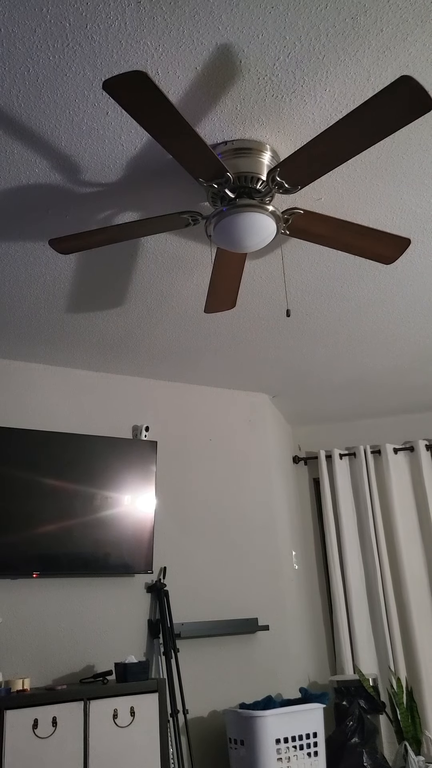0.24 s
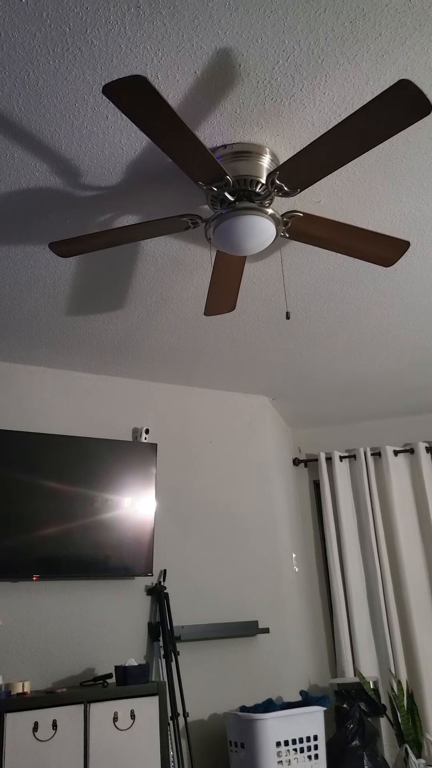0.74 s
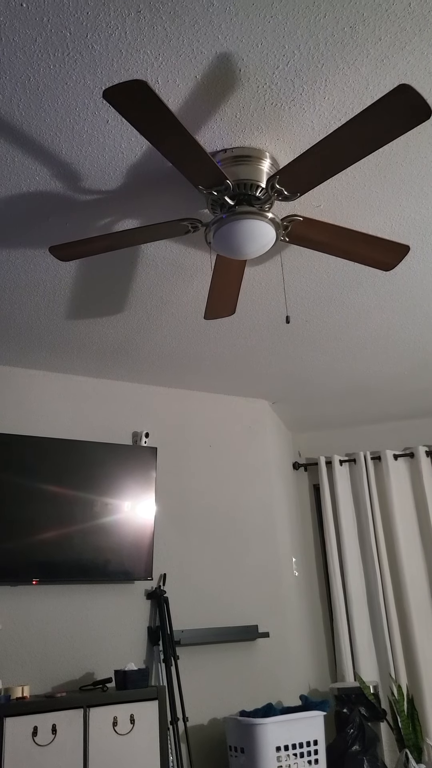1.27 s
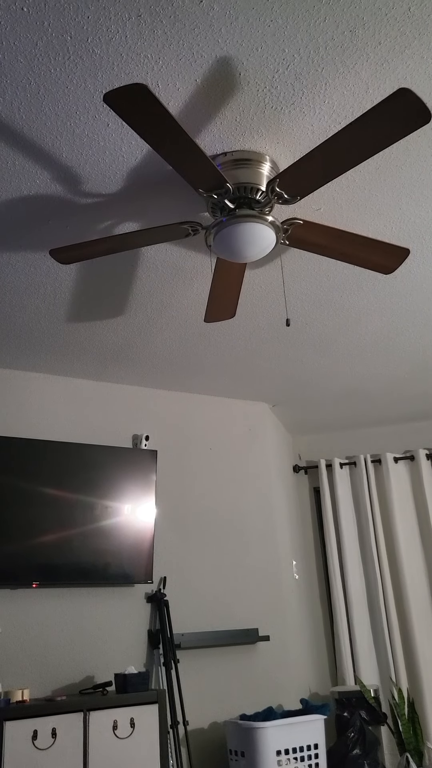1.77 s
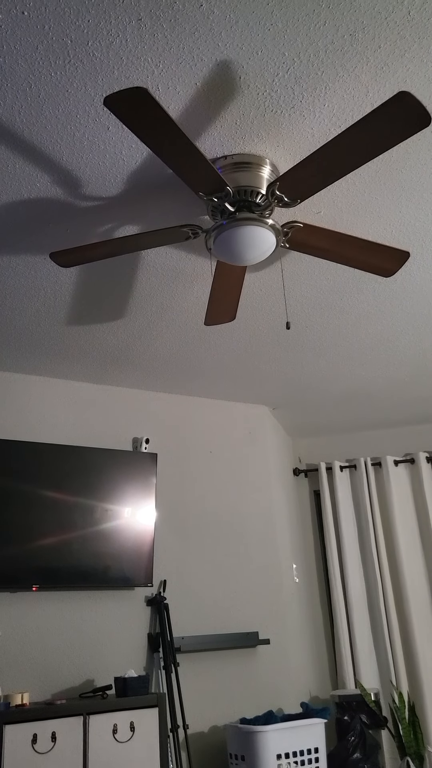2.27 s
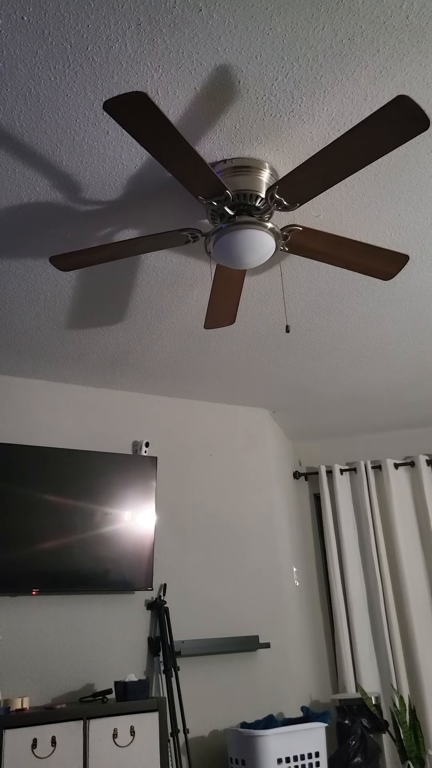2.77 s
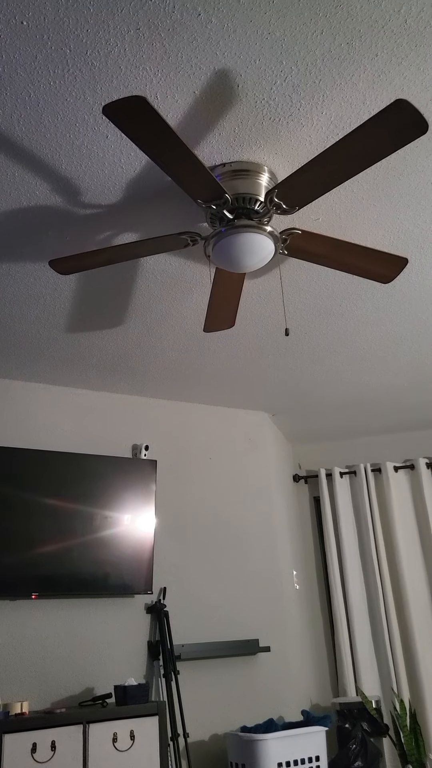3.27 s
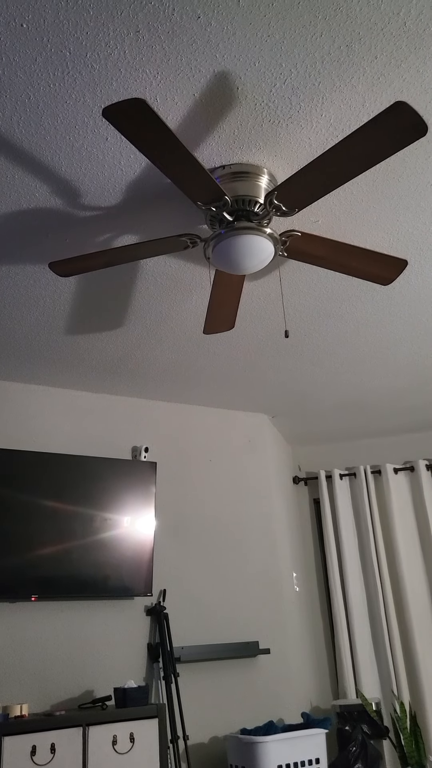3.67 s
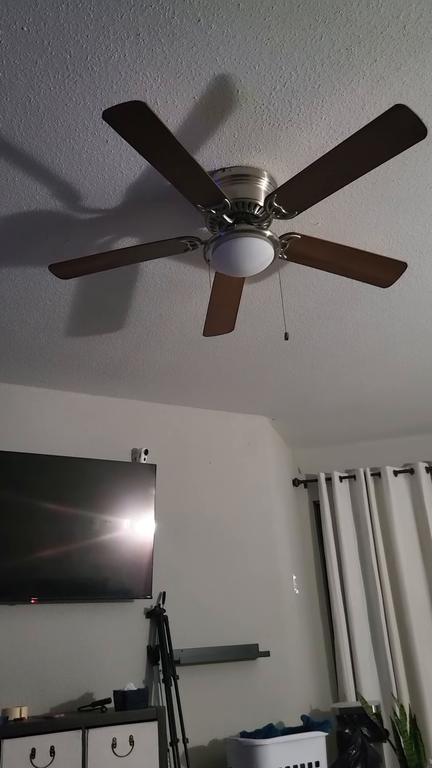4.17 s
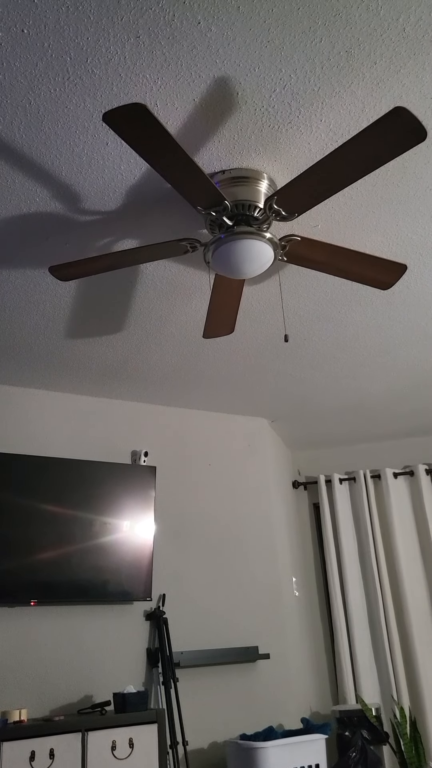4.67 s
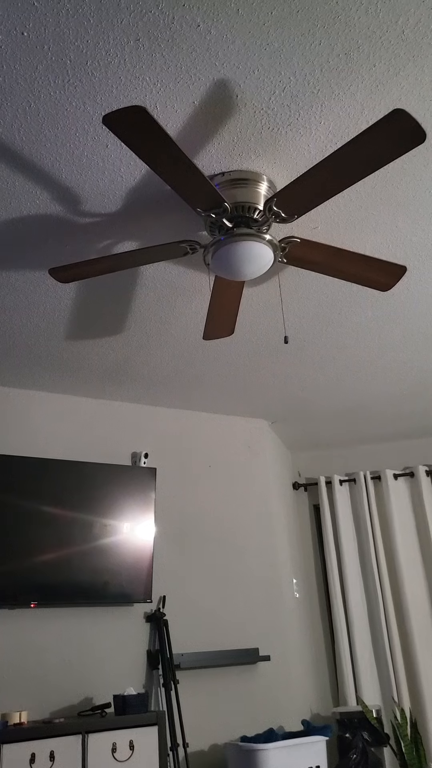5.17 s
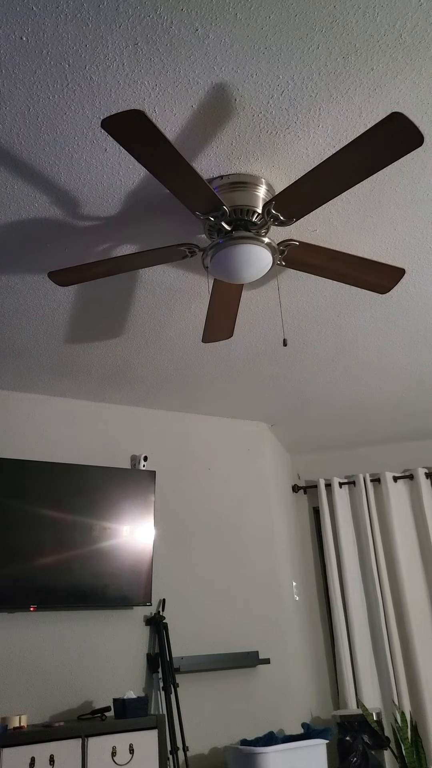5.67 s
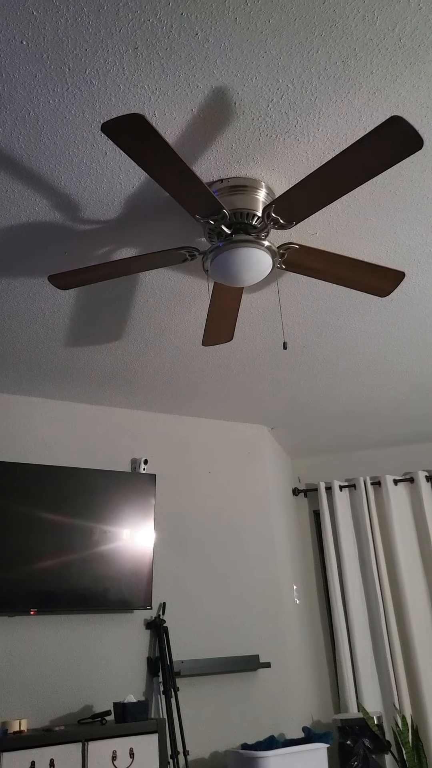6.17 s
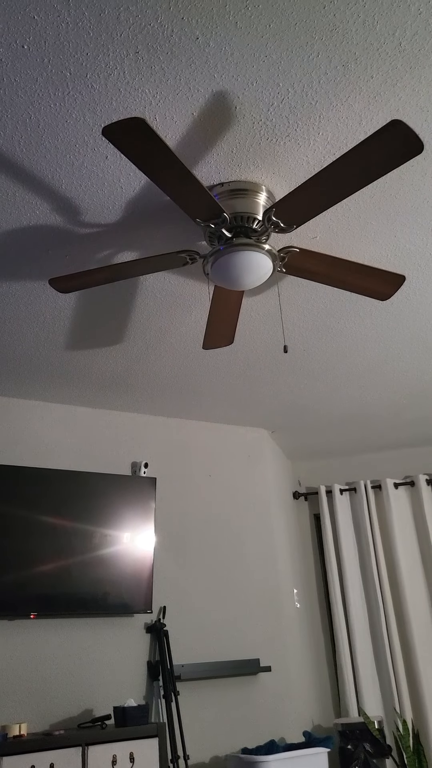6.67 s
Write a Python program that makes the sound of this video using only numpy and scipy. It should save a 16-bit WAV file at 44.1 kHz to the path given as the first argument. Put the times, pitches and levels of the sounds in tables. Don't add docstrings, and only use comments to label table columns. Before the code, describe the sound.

Heavy footsteps run across the floor above a quiet room at night, deep muffled thuds about twice a second, with ceiling cracks and faint buzzes.

```python
import sys
import numpy as np
from scipy import signal
from scipy.fft import rfft, irfft, next_fast_len
from scipy.io import wavfile
from scipy.ndimage import uniform_filter1d, map_coordinates

SR = 44100
rng = np.random.default_rng(int(sys.argv[2]) if len(sys.argv) > 2 else 0)


def natural_amplitude(level_db):
    exponent = np.asarray(level_db, float) / 20
    return 10 ** exponent


def digitize_waveform(pressure):
    field = np.atleast_2d(pressure).T
    bounded = np.clip(field, -1, 1)
    quanta = np.round(bounded * 32767).astype(np.int16)
    wavfile.write(sys.argv[1], SR, quanta)


N = 305039

# (crest time [s], peak level [dB], pitch [Hz], rise [ms], fall [ms])
STEPS = [(0.936, -27, 57.6, 34, 21), (1.444, -20, 58.8, 23.7, 19.5), (1.934, -27.5, 45.2, 53, 30),
         (2.379, -27, 50.7, 27.6, 25), (2.839, -17.5, 61.4, 18.1, 31), (3.318, -23.5, 70, 11, 24),
         (3.364, -25, 65.2, 30, 78), (3.785, -29, 56.6, 26, 30), (4.264, -26.5, 45.2, 21, 51),
         (4.763, -21.5, 45.5, 34, 27), (5.258, -23, 40.7, 36.6, 9.7), (5.738, -25.5, 49, 31, 28)]
# (crest time [s], peak level [dB], pitch [Hz], rise [ms], fall [ms])
STIFF_SWINGS = [(3.445, -41.5, 92.3, 20, 24), (3.641, -45, 86, 18, 30), (4.263, -36, 83.6, 16, 56),
                (4.548, -42.5, 94, 15, 28), (4.75, -35.5, 88.2, 29, 23), (5.236, -31.5, 81, 18, 24),
                (5.25, -48.5, 157, 22, 35), (1.906, -47, 118.6, 18, 33), (4.36, -46, 202, 25, 30),
                (4.585, -48.5, 150, 19, 25), (4.86, -46, 186, 15, 16), (1.49, -46.5, 150, 18, 22),
                (2.0, -50, 194, 17, 29), (5.33, -51.5, 320, 19, 25), (2.85, -49, 276, 18, 20),
                (1.75, -53.5, 285, 14, 20), (.4, -44.5, 140, 25, 20), (1.965, -57.5, 630, 18, 17),
                (3.27, -45, 215, 18, 25), (2.4, -49.5, 190, 14, 20), (4.32, -55.5, 519, 8.2, 14)]
# (crest time [s], peak level [dB], pitch [Hz])
REBOUNDS = [(1.005, -31.5, 61.5), (1.063, -32.5, 53.2), (1.152, -42, 59), (1.26, -49, 60),
            (1.53, -29, 59.6), (1.574, -30, 42.9), (1.692, -38, 39.3), (2.071, -34, 45.5), (2.433, -32, 64),
            (2.47, -31, 55.8), (2.53, -35.5, 56), (2.95, -32, 40.2), (2.989, -29.5, 41.1),
            (3.49, -32, 52.6), (3.52, -34.5, 54), (3.848, -36.5, 46.6), (3.895, -39, 44),
            (4.329, -30, 38.4), (4.401, -34.5, 47.4), (4.476, -42.5, 47.8), (4.816, -24.5, 51),
            (4.907, -39, 49.3), (4.951, -32.5, 46.2), (5.296, -28, 49.8), (5.393, -41, 55.6),
            (5.436, -38, 51.4), (5.788, -28, 54), (5.84, -36, 52.8), (5.913, -36, 50.6)]
# (crest time [s], peak level [dB], pitch [Hz])
SHUFFLES = [
    (0.164, -33.5, 51.4),
    (0.228, -35, 53.3),
    (0.308, -35.5, 52),
    (0.435, -32.5, 51),
    (0.526, -36, 51.7),
    (0.604, -35.5, 60),
    (0.694, -34, 42),
    (0.858, -35, 55.4),
    (6.217, -42, 50.5),
    (6.799, -40.5, 44),
]
REBOUND_RISE_MS, REBOUND_FALL_MS, SHUFFLE_RISE_MS, SHUFFLE_FALL_MS = 22.2, 23, 12, 18

# (time [s], peak level [dB], hardness [dB], slap [dB])
KNOCKS = [(0.128, -43.5, -17.5, -31), (0.37, -38.5, -8, -24), (0.391, -41, -7.5, -25.5),
          (0.576, -39.5, -18, -35), (0.801, -45.5, -19, -30), (0.919, -38, -13.5, -31),
          (1.425, -40.5, -17.5, -32.5), (1.479, -50, -11, -25.5), (1.73, -54, -2.5, -19),
          (1.871, -35, -15.5, -33.5), (1.977, -45, -10, -21.5), (2.352, -33, -13, -30.5),
          (2.438, -47, 1, -16), (2.554, -48.5, -11.5, -24), (2.822, -38.5, -11, -26),
          (3.245, -35, -12, -36), (3.32, -35.5, -12.5, -25), (3.376, -43, -10, -25),
          (3.763, -38.5, -6.5, -21), (3.809, -44, -4, -22), (4.294, -42, -19, -35),
          (4.328, -39, -13.5, -30.5), (4.533, -41.5, -14.5, -41), (4.585, -50.5, -8.5, -30.5),
          (4.739, -41, -12.5, -29.5), (4.8, -43, -21.5, -34.5), (5.223, -50.5, -19.5, -34),
          (5.297, -39.5, -3.5, -16.5), (5.709, -48.5, -8, -29), (6.318, -49, -7.5, -22.5),
          (6.72, -54, -8, -20), (6.83, -58, -10, -21), (4.855, -50, -18.5, -31), (0.68, -48.5, -14, -25.5)]
# (frequency [Hz], width [Hz], level [dB])
BOARD_MODES = [(91.7, 25.6, -2), (135, 26, 1), (165.2, 11.1, 1.5), (207.4, 12.7, 1), (275, 25, -1.5),
               (320, 60, -6.5), (431, 110, -10.5), (549, 140, -13)]

# (time [s], peak level [dB], low band [dB], high band [dB], air band [dB])
CRACKS = [(0.915, -57.5, -14, -5.5, -19.5), (1.866, -59.5, -5, 2, -6), (1.9375, -55, -9, -6, -16),
          (1.944, -50.5, -3, -19, -30), (2.287, -67, -6, -7, -30), (2.347, -52, -14, -6.5, -9),
          (2.4209, -51.5, -1, -12, -21), (2.5278, -61, 0.5, -4, -23), (2.8115, -50.5, -28, -11, -24.5),
          (2.842, -54.5, -21, -14.5, -36), (3.257, -83, 2, -9.5, -15), (3.3125, -39.5, -8, -13.5, -25.5),
          (3.769, -37.5, -6, -16, -19.5), (4.3128, -62.5, -4, -9, -28), (4.317, -64.5, 10.5, -17, -33),
          (5.296, -41.5, -0.5, -8.5, -10.5)]
# (time [s], peak level [dB], low band [dB], high band [dB], air band [dB])
TICKS = [
    (.32, -67, 5, -20, -40),
    (2.217, -76, 3, -14, -30),
    (3.304, -65, -4, -6, -25),
    (3.754, -67, -12, -3, -25),
    (3.762, -58, -14, -12, -30),
    (4.259, -80, 10, -14, -30),
    (5.288, -55, -12, -14, -28),
    (6.834, -82, 12, -14, -30),
]
AIR_T60_S = 0.018

# (time [s], peak level [dB], pitch [Hz], high shelf [dB], low shelf [dB])
RATTLES = [(0.9312, -70, 2790, -11, -4), (1.0102, -71, 2340, -12, -5.5), (1.4145, -71, 3360, -12, 1),
           (1.4968, -67, 2240, -12, -2.5), (1.8745, -59.5, 2420, -9, -5), (1.874, -70.5, 4350, -5, -10),
           (1.886, -67, 2430, -11, -7), (1.945, -62, 2040, -23, -7), (1.955, -66.5, 4400, -15, -7),
           (1.99, -79.5, 2470, -21, 0), (2.293, -70.5, 2980, -6, -5.5), (2.356, -56, 2300, -9.5, -12),
           (2.422, -68, 3310, -30.5, 3.5), (2.812, -66.5, 3770, -14, -9.5), (2.83, -67, 4300, -11, -13.5),
           (2.861, -66.5, 3270, -15, -6), (2.889, -70, 3040, -25.5, 3.5), (2.929, -71, 2180, -30, -12.5),
           (3.246, -69, 2200, -7, 0), (3.3241, -52, 2530, -23, -7.5), (3.785, -52, 2680, -28, -6),
           (3.84, -66, 2320, -23, -12), (3.9, -69.5, 2840, -22, -8), (4.259, -75, 2180, -13.5, 6.5),
           (4.339, -69.5, 2180, -35, 2), (4.7323, -69, 2280, -18.5, -0.5), (5.232, -69, 2970, -4.5, -1),
           (5.312, -53, 2160, -24, -4.5), (5.368, -70.5, 2920, -30.5, -4), (5.708, -71, 2390, -30, -3.5),
           (6.305, -73, 1940, -20, 1), (6.759, -86, 2700, -10, 12)]
# (frequency [Hz], width [Hz], level [dB])
PANEL_MODES = [(1305, 220, -6), (1990, 320, -6), (2410, 320, -8), (2950, 600, -6), (4350, 450, -8)]
# (frequency [Hz], level [dB])
PANEL_COLOUR = [(300, -23.5), (500, -6.5), (1000, 5), (1600, -5.5), (2000, -4.5), (3000, -6), (4400, -9.5),
                (4900, -10.5), (8000, -19), (9500, -42)]
SWELL_MS, PANEL_SCATTER = 10.8, 0.029

# (peak time [s], level [dB], rise [s], low band [dB], high band [dB])
RUBS = [
    (0.01, -61, 0.068, -2, -6.5),
    (0.082, -61.5, 0.045, 3, -21),
    (0.335, -67.5, 0.029, 5, -25),
    (0.39, -67, 0.058, 0, -21),
    (0.435, -76, 0.037, 7.5, -22),
    (0.469, -58, 0.049, -4, -11),
    (0.53, -69.5, .04, -4.5, -3),
    (0.57, -76.5, 0.037, 1, -4),
    (0.666, -70.5, 0.05, -5, -21),
    (0.71, -72, 0.04, -9.5, -18),
]
# (frequency [Hz], width [Hz], level [dB])
FIXTURE_MODES = [(616, 74, 5.5), (860, 120, 6), (1540, 120, -3), (2280, 130, 7), (3070, 130, -2),
                 (3350, 100, 4), (3790, 100, 3), (4400, 200, -3.5)]
# (time [s], peak level [dB], pitch [Hz], length [s])
SQUEAKS = [(0.0054, -52, 3800, 0.022), (.012, -78.5, 7560, .018), (.045, -84, 7500, 0.016),
           (0.034, -59, 2290, 0.043), (0.06, -53, 2260, 0.031), (.088, -54, 2270, .016),
           (0.067, -66, 1883, 0.03), (0.088, -53, 354, 0.019), (0.044, -63.5, 3790, .06),
           (.14, -74, 3810, .07), (0.22, -79.5, 3800, .04), (0.24, -73, 2270, .03),
           (0.075, -56.5, 604, 0.044), (0.07, -64, 900, 0.063), (0.315, -58.5, 800, 0.06),
           (0.32, -72.5, 3380, 0.054), (.36, -66, 3100, 0.055), (0.33, -64.5, 2300, 0.05),
           (.38, -66, 2300, .055), (0.352, -61, 545, 0.055), (0.33, -67, 1530, 0.068),
           (0.345, -52.5, 510, 0.012), (0.36, -49.5, 340, 0.044), (0.36, -56.5, 740, 0.04),
           (0.36, -59, 606, 0.038), (0.49, -61.5, 890, 0.049), (0.467, -72.5, 4000, 0.019),
           (0.465, -68, 5400, 0.02), (0.45, -67, 2900, 0.047), (0.45, -65.5, 3720, 0.056),
           (0.41, -65, 2000, 0.019), (0.479, -61.5, 2295, 0.031), (0.45, -66.5, 2330, 0.035),
           (0.645, -72, 3200, 0.045), (0.63, -73, 3660, 0.058), (.725, -76, 3500, .04),
           (.71, -75, 3080, .03), (.645, -73, 2000, .025), (1.0, -71, 2350, 0.037), (1.88, -57, 2450, 0.02),
           (1.957, -57, 2010, 0.025), (1.875, -66.5, 4350, 0.038), (1.965, -68, 4300, .03),
           (1.885, -67, 2800, .04), (2.292, -74, 3030, 0.044), (2.365, -59, 2250, .03),
           (1.99, -65.5, 2520, 0.023), (2.836, -59, 3570, 0.018), (2.878, -63.5, 3130, 0.022),
           (2.955, -71.5, 2100, 0.034), (4.335, -65, 2030, .02), (5.4, -69.5, 2200, 0.016),
           (6.2, -60, 150, 0.13)]
RUB_FADE_DB_PER_S = 129
WAVER_RAD, FLUTTER_DB = .09, 4

# (time [s], rustle level [dB])
STIR = [
    (0.0, -71.5),
    (0.17, -82.5),
    (0.38, -75.5),
    (0.5, -74),
    (1.13, -83),
    (3.5, -86),
    (5.4, -89.5),
    (6.92, -89.5),
]
# (frequency [Hz], density [dB per Hz])
RUMBLE = [(15, -52), (25, 24.5), (42, 23.5), (62, 21), (90, 13), (130, -49)]
UNREST_TOP_DB = -66.5
CALM_DB, UNREST_SHARE, AFTER_DB, AFTER_SHARE, AFTER_S = -58.5, 0.88, -50.5, 0.43, .11

# (time [s], level [dB])
AIR = [
    (0, -100),
    (.2, -103),
    (.55, -102),
    (.9, -109),
    (6.92, -118),
]
# (frequency [Hz], level [dB rms])
HUM = [(160, -67.5), (201, -65), (320, -68), (7480, -112)]
# (frequency [Hz], density [dB per Hz])
QUIET = [(20, -12), (44, -7.5), (70, -6.5), (116, -17), (230, -19), (480, -31), (1000, -40.5), (1400, -44),
         (1900, -54), (3500, -70), (4500, -66.5), (5000, -64), (8000, -72), (15400, -65)]
QUIET_DB = -58

# (frequency [Hz], t60 [s])
ROOM = [(150, 0.42), (800, 0.47), (2500, 0.49), (5000, 0.53), (8000, 0.4), (13000, 0.13)]
# (frequency [Hz], correlation [-1..1])
ALIKE = [(60, 0.99), (130, 1), (290, 1), (640, 0.62), (1410, 0.016), (3100, 0.012), (6820, -0.7),
         (15000, 0.6)]
# (frequency [Hz], left minus right [dB])
TILT = [(60, 0.5), (110, 1), (200, -1), (380, -1), (700, 0.5), (1290, 2), (2380, 2.5), (4400, 0.5),
        (8120, 9), (15000, -3)]
# (frequency [Hz], gain [dB])
PORT = [(3900, 0), (4400, 0), (4800, -4), (6500, 1.5), (7100, 4.5), (7500, 10.5), (7900, -6), (8300, -10),
        (10500, -5), (11500, 0.5), (14000, -5.5), (15380, 0), (15500, -8)]
LEAD_S, TOP_HZ = .0003, 15500


def unit(x):
    return x / np.sqrt(np.mean(x ** 2) + 1e-20)


def along(points, hz):
    f, v = np.transpose(points)
    return np.interp(np.log(hz + 1), np.log(f + 1), v)


def curve(rows):
    s, value = np.transpose(rows)
    return np.interp(np.arange(N) / SR, s, value)


def wobble(rate_hz):
    knots = rng.standard_normal(int(N * rate_hz / SR) + 4)
    return map_coordinates(knots, [np.arange(N) * rate_hz / SR])


def filtered(x, response):
    n = x.shape[-1]
    m = next_fast_len(n + 4096)
    return irfft(rfft(x, m) * response(np.fft.rfftfreq(m, 1 / SR)), m)[..., :n]


def band(lo_hz, hi_hz):
    return lambda f: 1 / (1 + (lo_hz / (f + 1)) ** 8 + (f / hi_hz) ** 16)


def resonance(hz, width_hz):
    return lambda f: 1j * f * width_hz / (hz * hz - f * f + 1j * f * width_hz)


def add(track, s, sound):
    i = max(round(s * SR), 0)
    track[..., i:i + sound.shape[-1]] += sound[..., :N - i]


def diffuse(length):
    turn = lambda hz: np.arccos(np.clip(along(ALIKE, hz), -1, 1)) / 2
    share = lambda hz: np.array([np.cos(turn(hz)), np.sin(turn(hz))])
    mid, side = filtered(rng.standard_normal((2, length)), share)
    return np.array([mid + side, mid - side])


def in_room(burst, wet_db, build_s):
    hz, t, z = signal.stft(diffuse(SR * 3 // 5), SR, nperseg=256)
    decay = natural_amplitude(-60 * t / along(ROOM, hz)[:, None])
    tail = signal.istft(z * decay * (1 - np.exp(-t / build_s)), SR, nperseg=256)[1]
    out = natural_amplitude(wet_db) * signal.fftconvolve(burst, tail / np.linalg.norm(tail[0]), axes=1)
    out[:, :burst.shape[1]] += burst
    return out


def joists():
    out = np.zeros(N)
    t = np.arange(-SR // 8, SR // 8) / SR
    swings = STEPS + STIFF_SWINGS
    swings = swings + [(*row, REBOUND_RISE_MS, REBOUND_FALL_MS) for row in REBOUNDS]
    swings = swings + [(*row, SHUFFLE_RISE_MS, SHUFFLE_FALL_MS) for row in SHUFFLES]
    for s, db, hz, rise_ms, fall_ms in swings:
        shape = natural_amplitude(db - 10.7 * np.abs(1000 * t / np.where(t < 0, rise_ms, fall_ms)) ** 3.02)
        phase = 2 * np.pi * hz * t * (1 - 2.4 * t) + np.pi * 3 / 4
        next_mode = natural_amplitude(-21.5) * np.sin(1.75 * phase)
        add(out, s + t[0], shape * (np.sin(phase) + next_mode))
    return out


def boards():
    out = np.zeros((2, N))
    t = np.arange(SR // 6) / SR
    muffle = lambda f: 1 / (1 + 1j * f / 900) ** 3
    slap = lambda f: muffle(f) * resonance(800, 900)(f) ** 2
    for s, db, hardness_db, slap_db in KNOCKS:
        reach = [(220, 0), (250, hardness_db + 7)]
        modes = lambda f: sum((-1) ** k * natural_amplitude(mode_db + along(reach, hz)) * resonance(hz, width_hz)(f)
                              for k, (hz, width_hz, mode_db) in enumerate(BOARD_MODES))
        wood = lambda f: muffle(f) * modes(f)
        push = diffuse(len(t)) * natural_amplitude(-60 * t / 0.16) * (1 - np.exp(-t / 0.0028))
        knock = unit(filtered(push, wood)) + natural_amplitude(slap_db + 6) * unit(filtered(push, slap))
        add(out, s - .004, natural_amplitude(db - 13.5) * in_room(knock, wet_db=-2.5, build_s=0.015))
    return out


def cracks():
    out = np.zeros((2, N))
    t = np.arange(SR // 20) / SR - .005
    dying = natural_amplitude(-60 * t / .032) * np.clip(t / .004, 0, 1) ** 2
    brief = natural_amplitude(-60 * np.abs(t - .003) / AIR_T60_S)
    for s, db, low_db, high_db, air_db in CRACKS + TICKS:
        burst = (diffuse(len(t)) + 0.34 * rng.standard_normal(len(t))) * dying
        lumps = list(zip(np.geomspace(700, 15500, num=24), 2.5 * rng.standard_normal(24)))
        burst = filtered(burst, lambda hz: natural_amplitude(along(lumps, hz)))
        bands = [(2500, 5000, 0), (700, 2500, low_db - 4), (5000, 8100, high_db)]
        snap = sum(natural_amplitude(part_db) * unit(filtered(burst, band(lo, hi))) for lo, hi, part_db in bands)
        snap = snap + natural_amplitude(air_db + 3.0) * unit(filtered(burst * brief, band(8900, 16000)))
        add(out, s - .006, natural_amplitude(db - 18) * in_room(snap, wet_db=-7, build_s=0.001))
    return out


def rattles():
    out = np.zeros((2, N))
    t = np.arange(SR // 5) / SR
    swell = 1000 * t / SWELL_MS
    for s, db, hz, high_db, low_db in RATTLES:
        shifts = 1 + PANEL_SCATTER * rng.standard_normal(len(PANEL_MODES))
        modes = lambda f: sum(natural_amplitude(mode_db) * np.abs(resonance(mode_hz * k, width_hz)(f)) ** 2
                              for (mode_hz, width_hz, mode_db), k in zip(PANEL_MODES, shifts))
        shelves = [(1300, low_db + 6), (2000, 0), (3500, 0), (6200, high_db + 12)]
        colour = lambda f: natural_amplitude(along(PANEL_COLOUR, f) + along(shelves, f))
        panel = lambda f: colour(f) * (0.16 + np.abs(resonance(hz, 900)(f)) + modes(f))
        grains = natural_amplitude(7.2 * unit(uniform_filter1d(rng.standard_normal(len(t)), size=120)))
        buzz = unit(filtered(diffuse(len(t)) * grains * swell * np.exp(-swell), panel))
        add(out, s - .01, natural_amplitude(db - 14.5) * in_room(buzz, wet_db=4.5, build_s=0.0013))
    return out


def fixture_rub():
    power = np.zeros((3, N))
    t = np.arange(SR) / SR
    for s, db, rise_s, low_db, high_db in RUBS:
        stroke = np.clip(1 + (t - s) / rise_s, 0, 1) ** 2 * natural_amplitude(-RUB_FADE_DB_PER_S * np.clip(t - s, 0, 1))
        add(power, 0, (natural_amplitude(db + np.array([[0], [low_db], [high_db]])) * stroke) ** 2)
    mid, low, high = np.sqrt(power)
    noise = lambda lo, hi: unit(filtered(diffuse(N), band(lo, hi)))
    rub = mid * noise(1900, 4600) + low * noise(350, 1800) + high * noise(4900, 6100)
    modes = lambda f: sum(natural_amplitude(db) * np.abs(resonance(hz, width_hz)(f)) ** 2 for hz, width_hz, db in FIXTURE_MODES)
    return natural_amplitude(-6.5 + 1.1 * wobble(60)) * filtered(rub, lambda f: 1.03 + modes(f))


def fixture_squeaks():
    out = np.zeros((2, N))
    for s, db, hz, length_s in SQUEAKS:
        t = np.arange(round(length_s * SR)) / SR
        steps = uniform_filter1d(rng.standard_normal((2, SR // 3)), size=150)
        waver = WAVER_RAD * steps.cumsum(axis=1)[:, :len(t)]
        flutter = unit(uniform_filter1d(rng.standard_normal(SR // 3), size=200))[:len(t)]
        squeak = np.sin(np.pi * t / length_s) * np.sin(2 * np.pi * hz * t + waver)
        squeak = filtered(squeak * natural_amplitude(FLUTTER_DB * flutter + 0.5), band(hz / 2, hz * 1.3))
        add(out, s, natural_amplitude(db) * in_room(squeak, wet_db=-11, build_s=0.004))
    return out


def shaking():
    unrest_db = np.minimum(curve(STIR), UNREST_TOP_DB) - STIR[-1][1]
    power = natural_amplitude(CALM_DB + UNREST_SHARE * unrest_db) ** 2
    u = np.arange(SR // 2) / SR / AFTER_S
    swell = u ** 2 * np.exp(2 - 2 * u)
    for s, db, *_ in STEPS:
        add(power, s, (natural_amplitude(AFTER_DB + AFTER_SHARE * (db + 29.0)) * swell) ** 2)
    return natural_amplitude(3) * np.sqrt(power) * unit(filtered(diffuse(N), lambda hz: natural_amplitude(along(RUMBLE, hz))))


def frame_rustle():
    rustle = unit(filtered(diffuse(N), lambda hz: band(1300, 4600)(hz) / (hz + 300)))
    air = unit(filtered(diffuse(N), band(10800, 16000)))
    return natural_amplitude(curve(STIR) + 1.5) * rustle + natural_amplitude(curve(AIR)) * air


def night():
    hush = filtered(diffuse(N), lambda hz: natural_amplitude(along(QUIET, hz)))
    hush = hush / np.sqrt(np.mean(filtered(hush, lambda hz: hz > 110) ** 2))
    t = np.arange(N) / SR
    hum = sum(natural_amplitude(db + 0.5 + 1.5 * wobble(3.6)) * np.sin(2 * np.pi * hz * t + 1.3 * wobble(6)) for hz, db in HUM)
    return natural_amplitude(QUIET_DB - 2.0 + wobble(1.9)) * hush + hum


def scene():
    steps = joists() + boards() + cracks() + rattles()
    return steps + fixture_rub() + fixture_squeaks() + shaking() + frame_rustle() + night()


def band_limit(x):
    return signal.sosfilt(signal.butter(12, 15500, fs=SR, output="sos"), x)


def record(dry):
    going_on = np.pad(dry, ((0, 0), (2048, 2048)), "reflect")
    halves = [.5, -.5]
    apart = lambda hz: np.exp(2j * np.pi * LEAD_S * np.outer(halves, hz))
    gain = lambda hz: natural_amplitude(along(PORT, hz) + np.outer(halves, along(TILT, hz)))
    mix = filtered(going_on, lambda hz: gain(hz) * apart(hz) * (hz < TOP_HZ))[:, 2048:-2048]
    return band_limit(mix)


dry = scene()
out = record(dry)
digitize_waveform(out)
```